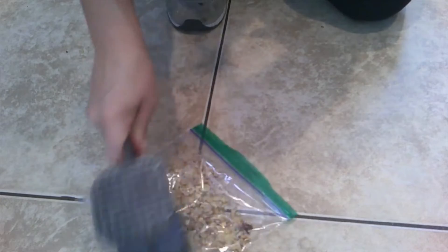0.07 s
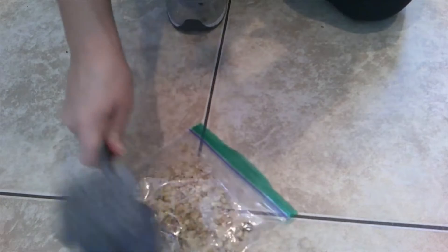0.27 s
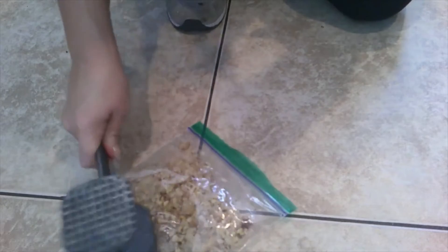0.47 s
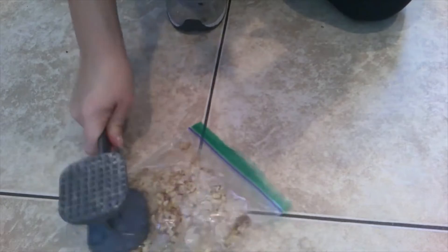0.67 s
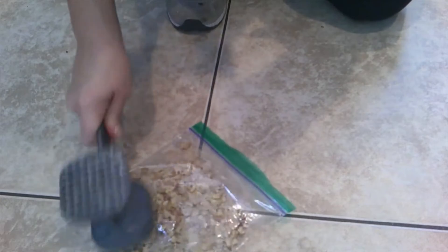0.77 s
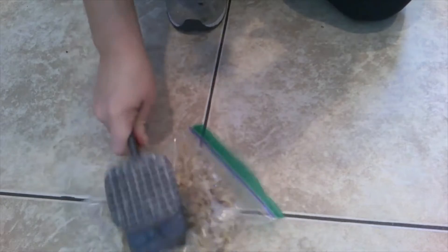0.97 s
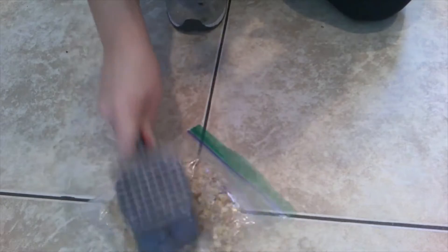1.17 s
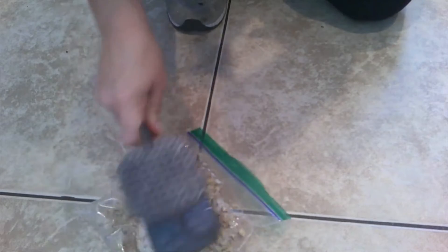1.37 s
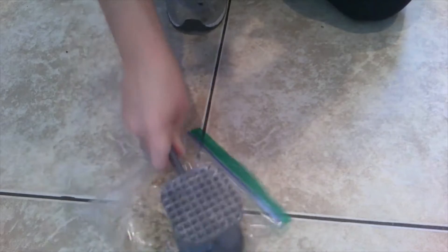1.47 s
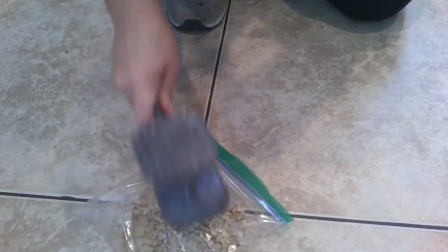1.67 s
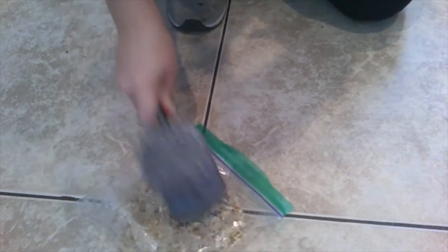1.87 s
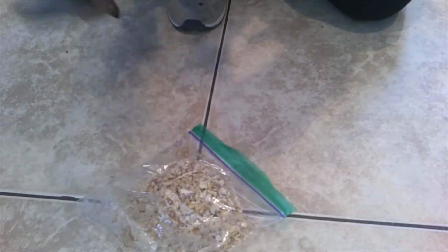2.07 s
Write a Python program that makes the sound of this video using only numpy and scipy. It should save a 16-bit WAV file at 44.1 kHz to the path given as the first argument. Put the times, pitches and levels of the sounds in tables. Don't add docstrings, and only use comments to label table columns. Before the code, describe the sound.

Seven sharp, even mallet blows crack nuts in a bag against tile, ringing through a kitchen

```python
import sys
import numpy as np
from scipy import signal
from scipy.fft import rfft, irfft
from scipy.io import wavfile

SR = 44100
rng = np.random.default_rng(int(sys.argv[2]) if len(sys.argv) > 2 else 0)


def dump(signal):
    limited = np.clip(np.atleast_2d(signal).T, -1, 1)
    pcm = np.round(limited * 32767).astype(np.int16)
    wavfile.write(sys.argv[1], SR, pcm)


def how_loud(loudness_db):
    steps = np.asarray(loudness_db, float) / 20
    return 10 ** steps


N = 93492
LEAD = SR // 5

# stop_s, crunch_db, crack_db, thud_db, thud_contact_ms
BLOWS = [
    (-.09, -17, -2, -14.5, 1.47),
    (.192, -22, -14, -27.5, 0.92),
    (.471, -17, 0, -28.5, 0.86),
    (.7385, -21, -13, -15, 1.13),
    (1.0105, -17, -2.5, -7, 0.75),
    (1.2645, -21.5, 1.5, 1, 0.79),
    (1.5545, -20, -2.5, -19, 0.66),
    (1.8405, -17.5, 2.5, -4.5, 0.57),
]
# crush_ms, head_ring_db, crack_centre_hz, thud_centre_hz
LANDINGS = [(28, -46, 1500, 560), (17.5, -49, 2300, 244), (14, -5, 2370, 280), (12, -42, 1800, 336),
            (11.1, -43, 2020, 304), (12.705, -40, 1300, 590), (18, -35, 1750, 235),
            (12.485, -38.5, 1340, 520)]
# pitch_hz, level_db (per Hz)
CRUNCH_COLOUR = [(180, -26), (300, -10), (1880, -3.5), (2720, -6), (3280, -13.5), (3830, -19.5),
                 (5470, -25), (7270, -19), (9000, -40.5), (11700, -61), (19800, -120)]
# pitch_hz, level_db, t60_s
SLAB_MODES = [(137.2, -1.5, 0.19), (186, -8.5, 0.042), (237.3, 0, 0.095), (301.6, -0.5, 0.11),
              (383, -5, 0.12), (567.6, -5, 0.15), (579, -11, 0.3), (637, -6.5, 0.21), (774, -12, 0.11)]
# pitch_hz, level_db, t60_s
HEAD_MODES = [(956, -24.5, .05), (2010, -17, 0.39), (2210, -21, .15), (1994, 1, 0.037), (2502, -22.5, 0.19),
              (2030, -30, 0.3), (2724, -24, .15), (3090, -21, 0.13), (3280, -19.5, 0.17),
              (3347, -20.5, 0.1), (3630, -21, 0.048), (6554, -28, 0.22)]
# centre_s, level_db, length_ms
RUSTLES = [(.07, -48.5, 7.4), (0.316, -49.5, 15.96), (0.373, -64, 8.86), (0.554, -48.5, 23.28),
           (.84, -53.5, 10), (1.122, -45, 6), (1.342, -49, 14), (1.387, -52.5, 10), (1.61, -57, 14),
           (1.751, -59.5, 9.56), (1.927, -43.5, 11.725)]
# pitch_hz, t60_s
KITCHEN_DECAY = [(100, 0.07), (260, 0.37), (700, .5), (1840, 0.4552), (4850, 0.31), (8000, 0.2)]
# pitch_hz, level_db
KITCHEN_COLOUR = [(100, 0.011), (260, 0.0089), (700, 0.012), (1840, 0.032), (4850, 0), (8000, 0)]
# pitch_hz, level_db (per Hz)
HUM_COLOUR = [(18, -48.5), (30, -6), (207, 4.5), (771, -5.5), (909, -8), (1980, -10), (4830, -33.5),
              (7210, -25), (8300, -37), (10800, -71), (18300, -120)]
# centre_s, above_hz, length_ms
DROPOUTS = [(.085, 3500, 10), (0.487, 4000, 25), (.705, 3800, 19), (.94, 3400, 16), (1.066, 4000, 9.4),
            (1.323, 3100, 9.5), (1.365, 3100, 10.3), (2.045, 3000, 6)]

CRUSH_RISE_DB, CRUSH_FALL_MS = 20, 4.84
GRAINS_PER_S, GRAIN_SPREAD_DB = 5000, 3
CRACK_MS, CRACK_T60_S, CRACK_BROAD_DB = 1.53, 0.0022, -4.5
THUD_T60_S, THUD_LAG_MS, SLAB_DB = 0.01, 0.87, -15.5
RADIATES_ABOVE_HZ = 162
WET_DB, EARLY_DB, EARLY_T60_S, FIRST_ECHO_MS = -6.5, -15, 0.057, 3.5
HUM_DB, MAINS_RUMBLE_DB = -50, -68.5
MIC_LOW_HZ, MIC_TOP_HZ = 116, 9380
PREAMP_TOP, OVERLOAD = 0.72, 0.70


def at_hz(points, hz):
    table_hz, values = np.transpose(points)
    return np.interp(np.log(np.maximum(hz, 1)), np.log(table_hz), values)


def rms_one(x):
    return x / np.sqrt(np.mean(x ** 2) + 1e-20)


def filtered(x, hz, kind, order=2):
    return signal.sosfilt(signal.butter(order, hz, kind, fs=SR, output="sos"), x)


def coloured(x, spectrum):
    gain = how_loud(at_hz(spectrum, np.fft.rfftfreq(len(x), 1 / SR)))
    return irfft(rfft(x) * rms_one(gain), len(x))


def clock():
    return (np.arange(N + LEAD) - LEAD) / SR


def ring(x, hz, t60):
    r = how_loud(-60 / (t60 * SR))
    w = 2 * np.pi * hz / SR
    return signal.lfilter([0, np.sin(w)], [1, -2 * r * np.cos(w), r * r], x + 1e-18)


def push(s, ms):
    force = np.sin(np.pi * np.clip((clock() - s) * 1000 / ms, 0, 1))
    return force / force.sum()


def struck(modes, levels_db, widths_ms, spread_db):
    luck = rng.normal(0, 1, (len(BLOWS), len(modes)))
    pushes = np.array([push(blow[0], ms) for blow, ms in zip(BLOWS, widths_ms)])
    out = 0
    for k, (hz, db, t60) in enumerate(modes):
        strengths = how_loud(levels_db + db + spread_db * luck[:, k])
        out = out + (-1) ** k * ring(strengths @ pushes, hz, t60)
    return out


def grains():
    n = N + LEAD
    sizes = how_loud(GRAIN_SPREAD_DB * np.minimum(rng.exponential(1, n), 5)) * rng.choice([-1, 1], n)
    happens = rng.random(n) < GRAINS_PER_S / SR
    return coloured(rms_one(sizes * happens), CRUNCH_COLOUR)


def house_hum():
    return how_loud(HUM_DB) * coloured(rng.standard_normal(N + LEAD), HUM_COLOUR)


def kitchen(x):
    t = np.arange(SR) / SR
    edges = 70 * 2 ** np.arange(0, 7.6, 0.5)
    white, tail = rng.standard_normal((2, SR)), 0
    for k, (low, high) in enumerate(zip(edges, edges[1:])):
        hz = np.sqrt(low * high)
        t60 = at_hz(KITCHEN_DECAY, hz)
        late = how_loud(WET_DB - 60 * t / t60) / np.sqrt(t60)
        early = how_loud(EARLY_DB - 60 * t / EARLY_T60_S) / np.sqrt(EARLY_T60_S)
        band = filtered(white[k % 2], [low, high], "band")
        tail = tail + how_loud(at_hz(KITCHEN_COLOUR, hz)) * band * (late + early)
    tail = tail * np.clip(t * 1000 / FIRST_ECHO_MS - 1, 0, 1) * np.sqrt(14 / SR)
    return signal.fftconvolve(x, tail)[:len(x)]


def rustle():
    t = clock()
    level = sum(how_loud(db) * np.exp(-((t - s) * 2000 / ms) ** 2) for s, db, ms in RUSTLES)
    return level * rms_one(filtered(grains(), 2500, "high"))


def head_ring():
    ring_db = np.transpose(LANDINGS)[1]
    return struck(HEAD_MODES, ring_db, np.full(len(BLOWS), 0.08), spread_db=1.5)


def thud():
    knock = 0
    for (s, _, _, db, ms), (*_, hz) in zip(BLOWS, LANDINGS):
        knock = knock + ring(how_loud(db) * push(s + THUD_LAG_MS / 1000, ms), hz, THUD_T60_S)
    knock = filtered(knock, RADIATES_ABOVE_HZ, "high")
    _, _, _, thud_db, contact_ms = np.transpose(BLOWS)
    return how_loud(8.0) * knock + struck(SLAB_MODES, thud_db + SLAB_DB, contact_ms, spread_db=2.0)


def crack():
    t, out, snaps = clock(), 0, rng.standard_normal(N + LEAD)
    for (s, _, db, *_), (_, _, hz, _) in zip(BLOWS, LANDINGS):
        since = (t - s) * 1000 / CRACK_MS
        body = ring(push(s, 0.17), hz, CRACK_T60_S)
        burst = np.exp(-np.abs(since) * np.where(since < 0, 0.7, 1))
        spray = coloured(snaps * burst, CRUNCH_COLOUR)
        body = body / np.linalg.norm(body)
        spray = spray / np.linalg.norm(spray)
        out = out + how_loud(db + 12.0) * (body + how_loud(CRACK_BROAD_DB) * spray)
    return out


def crunch():
    t, level = clock(), 0
    for (s, db, *_), (crush_ms, *_) in zip(BLOWS, LANDINGS):
        since = (t - s) * 1000
        swell = how_loud(CRUSH_RISE_DB * np.clip(since / crush_ms, -1, 0))
        onset = np.clip((since + crush_ms) / 1.5, 0, 1)
        level = level + how_loud(db) * swell * onset * np.exp(-np.maximum(since, 0) / CRUSH_FALL_MS)
    return level * grains()


def treble_dropouts(x):
    t, out = clock(), x
    for s, hz, ms in DROPOUTS:
        treble = signal.sosfiltfilt(signal.butter(8, hz, "high", fs=SR, output="sos"), x)
        out = out - treble * np.exp(-((t - s) * 2000 / ms) ** 4)
    return out


def scene():
    contact = crunch() + crack() + rustle()
    knock, head = thud(), head_ring()
    room = kitchen(contact + how_loud(-2.5) * knock + how_loud(-4) * head)
    mix = head + treble_dropouts(contact + knock + room + house_hum())
    return mix[None, LEAD:]


def band_limit(x):
    return signal.sosfilt(signal.butter(12, 15920, fs=SR, output="sos"), x)


def record(dry):
    x = filtered(dry, MIC_LOW_HZ, "high", order=4)
    rumble = filtered(rng.standard_normal(N), [18, 60], "band")
    x = np.clip(x, -PREAMP_TOP, PREAMP_TOP) + how_loud(MAINS_RUMBLE_DB) * rms_one(rumble)
    x = signal.sosfilt(signal.cheby2(14, 60, MIC_TOP_HZ, fs=SR, output="sos"), x)
    return band_limit(np.clip(x, -OVERLOAD, OVERLOAD))


dry = scene()
out = record(dry)
dump(out)
```